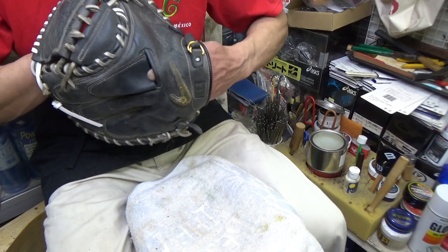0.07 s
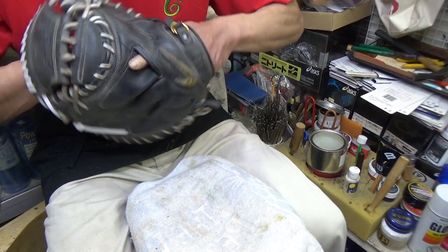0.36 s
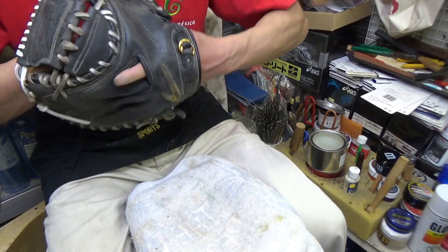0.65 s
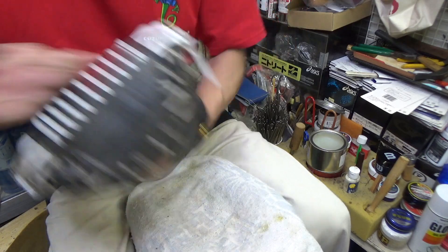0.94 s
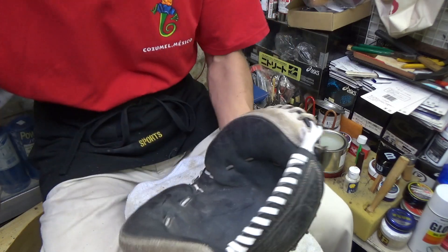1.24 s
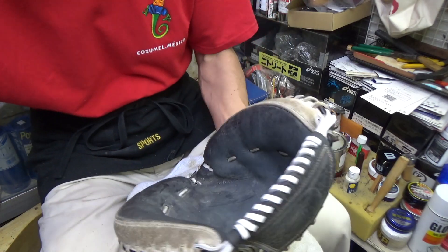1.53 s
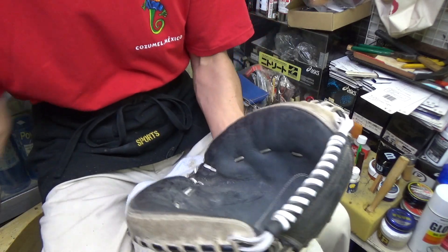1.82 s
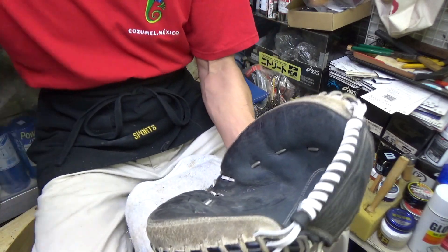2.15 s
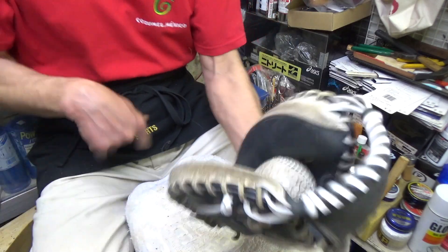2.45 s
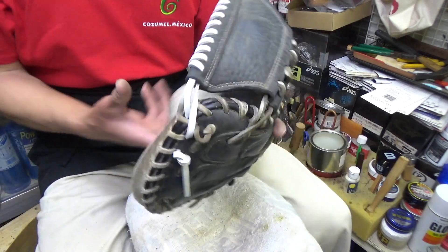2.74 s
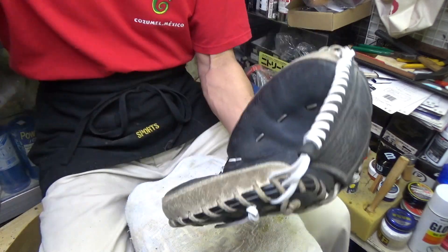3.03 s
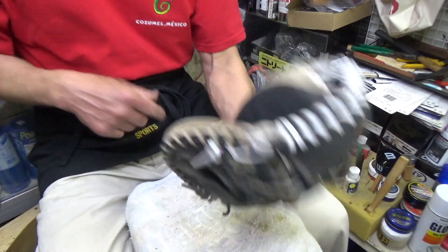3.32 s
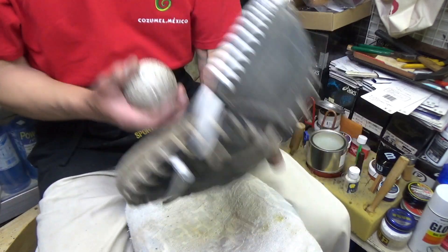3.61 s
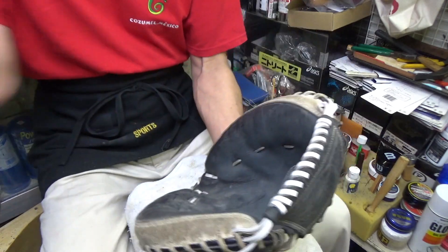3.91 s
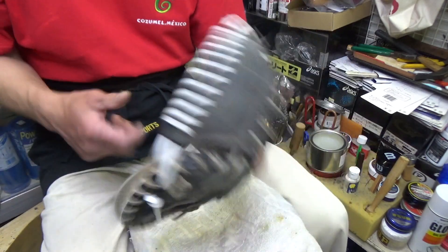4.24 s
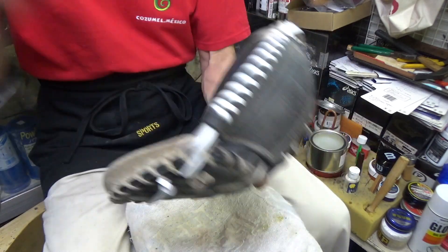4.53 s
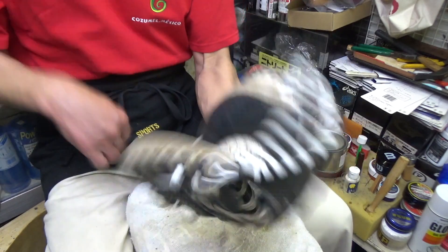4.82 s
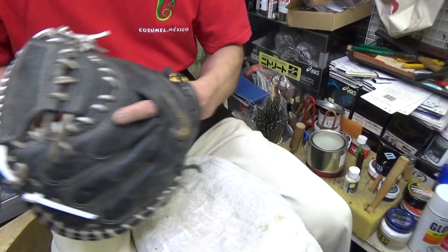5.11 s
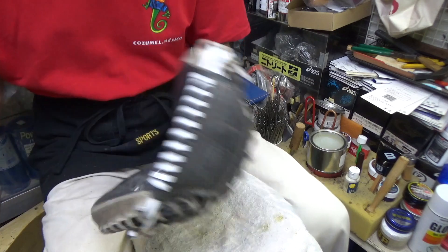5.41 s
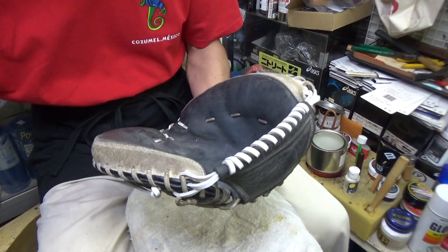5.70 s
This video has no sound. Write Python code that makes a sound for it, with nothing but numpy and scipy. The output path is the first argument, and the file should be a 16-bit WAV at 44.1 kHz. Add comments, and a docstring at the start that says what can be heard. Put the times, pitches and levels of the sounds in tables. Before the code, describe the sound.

A leather catcher's mitt is turned in the hands with soft rubbing and a dull knock, then squeezed so the hide creaks and the laces tick. A hand slaps the pocket four times at an even pace, each a loud, sharp crack with a hollow thump and brief room ring. More knocks and creaks follow. It is heard close, just left of centre, in a small workshop with faint ventilation and hum.

```python
"""Four slaps into the pocket of a leather catcher's mitt, just left of centre in a small workshop.
Palm and fingers crack on the pocket, trapped air colours each blow, and mitt and room ring.
Around the slaps the mitt is turned and flexed: the hide slides, creaks and knocks, the laces tick
and squeak. Ventilation and mains hum lie underneath. Each slap overloads the limiter behind the
camera's stereo microphones, so the room's answer comes up almost as loud as the crack."""
import sys
import numpy as np
from scipy import signal
from scipy.fft import rfft, irfft, next_fast_len
from scipy.io import wavfile
from scipy.ndimage import uniform_filter1d, minimum_filter1d, map_coordinates

SR = 44100
rng = np.random.default_rng(int(sys.argv[2]) if len(sys.argv) > 2 else 0)


def pcm_store(signal):
    """Save signal as 16-bit PCM."""
    levels = np.round(np.clip(np.atleast_2d(signal), -1, 1) * 32767)
    wavfile.write(sys.argv[1], SR, levels.astype(np.int16).T)


N = 262791
TIME = np.arange(N) / SR
AGE = np.arange(SR // 2) / SR  # seconds since a contact

# the mitt bumps against hand and knee: start_s, level_db, body_hz, rim_db, t60_s
BUMPS = [(.005, -32.5, 311, 2, 0.068), (.094, -39, 380, 13.5, 0.012), (.169, -32.5, 325, -9, 0.057),
         (0.3466, -9.5, 261, 5, 0.026), (0.509, -27, 318, 5, 0.032), (2.653, -23.5, 236, -6, 0.024),
         (2.821, -32.5, 235, -3, 0.035), (5.14, -25.5, 283, -2, 0.08), (5.153, -19.5, 282, -3, 0.037),
         (5.539, -12.5, 191, -5, 0.11), (5.546, -14, 104.5, -26, 0.13), (5.906, -21, 236, -15, 0.14),
         (5.929, -21.5, 253, 1.5, 0.12)]
# spectrum of a lace click: frequency_hz, level_db
TICK_SPECTRUM = [(100, -5), (600, -3.5), (1500, 2), (2800, 0.5), (4500, 2.5), (6500, 3), (8500, 6),
                 (12000, -1.5), (16000, -14)]
# spectrum of skin or cloth sliding: frequency_hz, level_db
SLIDE_SPECTRUM = [(88, -48), (150, -15), (341, -2.5), (730, -11), (998, -4), (1310, -12), (1450, -9.5),
                  (2400, -14), (3920, -15), (5050, -17), (8900, -13), (12400, -19), (16000, -30)]
# stereo width at the microphones: frequency_hz, side_db
STEREO_WIDTH = [(60, -19), (250, -17.5), (1000, -21), (4000, -25), (8000, -33), (14000, -43)]


def amp(db):
    """Decibels to gain."""
    return 10 ** (np.asarray(db) / 20)


def unit(x):
    """Scale to rms 1."""
    return x / np.sqrt(np.mean(x ** 2) + 1e-20)


def unit_energy(x):
    """Scale each channel to energy 1."""
    return x / np.linalg.norm(x, axis=-1, keepdims=True)


def along(points, hz):
    """Read (frequency_hz, value) points on a log axis."""
    frequencies, values = np.transpose(points)
    return np.interp(np.log(hz + 1), np.log(frequencies + 1), values)


def wobble(rate):
    """A smooth random curve with rate knots a second."""
    return map_coordinates(rng.standard_normal(int(N * rate / SR) + 4), [TIME * rate])


def coloured(x, gain_db):
    """Minimum-phase filter whose gain in dB is a function of frequency."""
    n = x.shape[-1]
    size = 2 * next_fast_len(n // 2 + 4096)
    gain = np.maximum(amp(gain_db(np.fft.rfftfreq(size, 1 / SR))), 1e-6)
    cepstrum = irfft(np.log(gain))
    cepstrum[1:size // 2] *= 2
    cepstrum[size // 2 + 1:] = 0
    return irfft(rfft(x, size) * np.exp(rfft(cepstrum)))[..., :n]


def shaped(x, spectrum):
    """Filter x by a spectrum of (frequency_hz, level_db) points."""
    return coloured(x, lambda hz: along(spectrum, hz))


def noise(spectrum, shape=N):
    """Noise of rms 1 with the given spectrum."""
    return unit(shaped(rng.standard_normal(shape), spectrum))


def resonance(hz, centre_hz, width=0.1):
    """Bell-shaped curve of height 1."""
    return 1 / (1 + ((hz - centre_hz) / (width * centre_hz)) ** 2)


def fade(t60, age=AGE):
    """Exponential decay, 60 dB down after t60 seconds."""
    return np.exp(-np.log(1000) * age / t60)


def mode(hz, t60):
    """One damped vibration."""
    return np.sin(2 * np.pi * hz * AGE) * fade(t60)


def burst(t60):
    """Dying noise of energy 1."""
    return unit_energy(rng.standard_normal(len(AGE)) * fade(t60))


def contact(t60, scatter):
    """A sharp impulse followed by a brief scatter of smaller ones."""
    force = scatter * burst(t60)
    force[0] += 1
    return unit_energy(force)


def add(track, start_s, sound):
    """Mix a sound into the track."""
    start = max(round(start_s * SR), 0)
    part = track[..., start:start + sound.shape[-1]]
    part += sound[..., :part.shape[-1]]


def room_tail(build_s=0.0011, late_db=-27, late_t60=0.56):
    """A fresh diffuse echo of the workshop, with a faint longer ring."""
    # reverberation time of the room: frequency_hz, t60_s
    room_decay = [(100, 0.34), (400, 0.2), (1500, 0.19), (5000, 0.22), (14000, 0.19)]
    hz, t, bands = signal.stft(rng.standard_normal(len(AGE)), SR, nperseg=256)
    decay = fade(along(room_decay, hz)[:, None], t) + amp(late_db) * fade(late_t60, t)
    tail = signal.istft(bands * decay, SR, nperseg=256)[1][:len(AGE)]
    return unit_energy(tail * (1 - np.exp(-(AGE / build_s) ** 2)))


def in_room(x, wet_db):
    """The direct sound plus the room's answer."""
    return x + amp(wet_db) * signal.fftconvolve(x, room_tail())[:len(x)]


def room_tone(air_db=-51):
    """Steady ventilation noise and a slightly unsteady mains hum."""
    # spectrum of the ventilation: frequency_hz, level_db
    air_spectrum = [(15, -58), (25, -9), (114, -5.5), (170, -7), (242, -0.5), (317, -11), (354, -1),
                    (394, -23.5), (476, -18), (531, -10), (1160, -12), (1400, -16.5), (1520, -20.5),
                    (5000, -27), (16000, -32.5)]
    # partials of the mains hum: pitch_hz, level_db
    partials = [(118.4, -61), (360.7, -62), (479.1, -68.5), (1157, -64.5), (2218, -75.5)]
    mid, side = noise(air_spectrum, (2, N))
    side = amp(-1.5) * shaped(side, STEREO_WIDTH)
    hum = sum(amp(db) * np.sqrt(2) * np.sin(2 * np.pi * hz * TIME + 0.5 * wobble(7.2))
              for hz, db in partials)
    return amp(air_db + 0.14 * wobble(4.66)) * np.array([mid + side, mid - side]) + hum


def slips(per_s, spread_db, smear_s=0.00091):
    """Stick-slip: random tiny impulses of unequal size, each tearing a few fibres after it."""
    chance, size = rng.random(N), rng.standard_normal(N)
    energy = (chance < per_s / SR) * amp(spread_db * np.minimum(size, 2)) ** 2
    energy = signal.lfilter([1], [1, -np.exp(-1 / (smear_s * SR))], energy)
    return unit(np.sqrt(energy) * rng.standard_normal(N))


def sliding(speed_power=1.06, scuff_db=-21.5, scuff_s=0.0081):
    """Strength of the hiss: strokes speed up and slow down, bumps scuff, the hand rustles throughout."""
    # skin and cloth stroke the leather: start_s, length_s, level_db
    strokes = [(0.079, 0.04, -36.5), (0.147, 0.16, -40.5), (0.378, 0.049, -43.5), (0.495, .06, -41.5),
               (0.544, .29, -34), (0.779, 0.07, -34.5), (0.848, 0.096, -43), (3.434, 0.066, -44.5),
               (3.61, 0.053, -49.5), (4.235, 0.086, -49.5), (4.408, .04, -41.5), (5.03, 0.066, -48.5),
               (5.149, 0.073, -52)]
    # the hand moves inside the mitt: time_s, level_db
    hand_rustle = [(0, -48.5), (1.0, -55.5), (1.35, -47), (2.1, -51), (2.7, -49.5), (3.1, -56),
                   (4.5, -57.5), (5.3, -59), (5.96, -48)]
    rubs = []
    for start_s, length_s, db in strokes:
        speed = np.abs(np.sin(np.pi * np.clip((TIME - start_s) / length_s, 0, 1)))
        rubs.append(amp(db) * speed ** speed_power)
    scuffs = [amp(db + scuff_db) * np.exp(-((TIME - s) / scuff_s) ** 2) for s, db, *_ in BUMPS]
    rustle = amp(np.interp(TIME, *np.transpose(hand_rustle)))
    return np.linalg.norm(rubs + scuffs + [rustle], axis=0)


def squeezing(grip_s=0.013, tighten_db_per_s=83, ease_s=0.011, settle_db=-15.5, settle_s=0.074):
    """Strength of the creak: each squeeze grips, tightens, eases and lets the hide settle."""
    # the hand squeezes the mitt: start_s, tighten_s, tightest_db
    squeezes = [(1.202, 0.08, -25), (1.322, 0.039, -32), (1.716, 0.024, -26.5), (1.745, 0.035, -19),
                (1.793, 0.061, -14), (1.93, 0.018, -27), (2.168, 0.021, -41.5), (5.533, 0.03, -30.5),
                (5.588, 0.065, -24), (5.696, 0.01, -33.5), (5.727, 0.022, -29.5), (5.925, .032, -27.5)]
    power = np.zeros(N)
    for start_s, tighten_s, db in squeezes:
        grip = np.clip((TIME - start_s) / grip_s, 0, 1)
        to_go = np.clip(start_s + tighten_s - TIME, 0, tighten_s)
        since = np.maximum(TIME - start_s - tighten_s, 0)
        release = np.maximum(np.exp(-since / ease_s), amp(settle_db) * np.exp(-since / settle_s))
        power += (amp(db - tighten_db_per_s * to_go) * grip * release) ** 2
    return np.sqrt(power)


def leather(creak_db=-1, brighten=0.56, uneven_db=1.86, crackle_db=-14):
    """Sliding gives a fine hiss; flexing gives coarser slips and lace clicks."""
    fine = slips(per_s=6000, spread_db=3, smear_s=0.001)
    coarse = slips(per_s=2200, spread_db=4, smear_s=0.0006) + 0.45 * rng.standard_normal(N)
    slide = unit(shaped(fine, SLIDE_SPECTRUM))
    # spectrum of the creaking hide: frequency_hz, level_db
    creak_spectrum = [(59, -30), (100, -16), (197, -4), (271, -6.5), (634, -10.5), (836, -5.5),
                      (1480, -9.5), (2470, -4), (2930, -9), (4200, -4.5), (6700, -4.5), (7940, -3),
                      (13500, -7.5), (16000, -13)]
    creak = unit(shaped(coarse, creak_spectrum))
    dull = signal.sosfilt(signal.butter(1, 1400, fs=SR, output="sos"), creak)
    squeeze = squeezing() * amp(uneven_db * wobble(70))
    tightness = np.maximum(squeeze, amp(-40)) / amp(-15)
    creak += dull * (tightness ** -brighten - 1)  # the harder the squeeze, the brighter
    creak += amp(crackle_db) * unit(shaped(slips(per_s=45, spread_db=1), TICK_SPECTRUM))
    return in_room(sliding() * slide + amp(creak_db) * squeeze * creak, wet_db=-10.5)


def squeaks():
    """A lace slipping in its hole sings briefly in a narrow, rough band."""
    # slipping laces: centre_s, level_db, pitch_hz, half_length_s
    lace_slips = [(1.12, -49, 1430, 0.15), (1.16, -51, 3220, 0.18), (2.072, -34, 810, 0.013),
                  (2.702, -39.5, 1320, 0.033), (3.658, -41.5, 2920, 0.0036)]
    out = np.zeros(N)
    for centre_s, db, hz, half_length_s in lace_slips:
        band = signal.butter(2, [0.83 * hz, 1.19 * hz], "band", fs=SR, output="sos")
        rub = unit(signal.sosfilt(band, rng.standard_normal(N)))
        out += amp(db) * rub * np.exp(-((TIME - centre_s) / half_length_s) ** 2)
    return out


def knocks():
    """Bumps ring the padded body and the stiff rim; low ones set in more slowly."""
    out = np.zeros(N)
    for start_s, db, body_hz, rim_db, t60 in BUMPS:
        body = mode(body_hz, t60) - 0.4 * mode(1.36 * body_hz, t60)
        body += 0.24 * mode(1.89 * body_hz, 1.13 * t60)
        rim = mode(980, 0.012) - mode(530, 0.014) - 0.25 * mode(1900, 0.008)
        onset = 1 - np.exp(-AGE * body_hz / 0.2)
        add(out, start_s, in_room(amp(db) * (body + amp(rim_db) * rim) * onset, wet_db=-9.5))
    return out


def ticks(snap_db=4, rustle_db=-4, echo_db=-11):
    """Laces flick the leather: a dry snap, a brief rustle of the hide, a short ring of the stiff web."""
    # lace ticks and leather snaps: start_s, level_db, web_db
    flicks = [(0.102, -19, -24.5), (0.5107, -28, -28.5), (1.124, -23.5, -44), (1.1839, -30, -35.5),
              (1.2854, -8, -50), (1.4046, -18, -35), (1.4564, -18, -41), (1.5331, -12.5, -59),
              (1.607, -4.5, -36), (1.6286, -4.5, -40), (1.6595, -8, -30.5), (1.92, 1, -45),
              (1.968, -12, -51), (1.9987, -12, -52), (2.0687, -10.5, -37), (2.413, -14.5, -38),
              (2.6866, 1, -21), (3.4867, 1.5, -17.5), (3.612, -15, -35.5), (4.3616, -5.5, -21),
              (5.595, -8, -36), (5.6965, -12, -39), (5.7247, -13, -32), (5.7472, -5, -26.5),
              (5.791, -9.5, -42), (5.8294, -14, -38), (5.899, -13, -36)]
    out = np.zeros(N)
    for start_s, db, web_db in flicks:
        force = contact(t60=0.008, scatter=0.8) + amp(echo_db) * room_tail()
        add(force, 0.001, amp(rustle_db) * burst(t60=0.027))
        snap = amp(db + snap_db) * unit_energy(shaped(force, TICK_SPECTRUM))
        web = amp(web_db) * (mode(764, 0.027) - 0.87 * mode(1310, 0.019))
        add(out, start_s + 0.0008, snap + web)
    return out


def slaps(crack_db=24, thump_db=-2, puff_db=-13, ring_db=-14, echo_db=19, swish_db=-46):
    """Air is squeezed out, palm and fingers crack on the pocket, then mitt and room ring."""
    # blows, with the resonances of the cupped palm and the finger gap:
    # start_s, level_db, tilt_db_per_octave, puff_s, finger_delay_s, palm_hz, palm_db, gap_hz, gap_db
    blows = [(2.4378, -3, -1, 0.014, 0.0038, 667, 10, 1000, 7),
             (3.2579, -1, -0.57, 0.016, 0.0028, 500, 9.5, 966, 9.5),
             (4.0564, 0, -1, 0.012, .0018, 1080, 5.5, 1720, 8.5),
             (4.8433, 1, -1, 0.013, 0.0014, 393, 2, 1370, 8.5)]
    # modes of the mitt and the workshop: pitch_hz, level_db, t60_s
    ring_modes = [(65.6, -12, 0.36), (126, 1, 0.25), (182, -15, 0.13), (231.5, -7, 0.27), (268.8, 5.5, 0.2),
                  (333, 3.5, 0.24), (405.8, 0, 0.19), (479.6, -6, 0.16), (608, -4.5, 0.18),
                  (739.5, -1.5, 0.17), (1002, -10, 0.25)]
    # spectra of the crack, the room's answer and the escaping air: frequency_hz, level_db
    crack_spectrum = [(40, -26), (110, -1.5), (300, 11), (550, 1), (1000, 0), (1800, -4.5), (3000, -8),
                      (7500, -9.5), (12000, -10), (16000, -31)]
    echo_spectrum = [(24, -29), (40, -34), (91, -16.5), (124, -9.5), (237, -5), (297, -6.5), (329, -4),
                     (491, -12), (918, -11.5), (2770, -16), (3060, -17.5), (3470, -18.5), (6820, -18.5),
                     (12800, -24.5), (16000, -33)]
    puff_spectrum = [(60, -29), (300, 11), (1000, -8), (2000, -13.5), (5000, -28), (16000, -54)]
    out = np.zeros(N)
    for start_s, db, tilt, puff_s, finger_delay_s, palm_hz, palm_db, gap_hz, gap_db in blows:
        def cupped_hand(hz):
            """Gain in dB: air trapped under the hand lends each blow its own resonances."""
            slope = tilt * np.log2((hz + 100) / 1000)
            return slope + palm_db * resonance(hz, palm_hz) + gap_db * resonance(hz, gap_hz)

        hit = np.zeros(N)
        force = contact(t60=0.02, scatter=5)
        add(force, finger_delay_s, contact(t60=0.028, scatter=5))
        crack = unit_energy(coloured(shaped(force, crack_spectrum), cupped_hand))
        add(hit, start_s, amp(crack_db) * crack)
        # the padding gives way a moment after the skin lands
        thump = mode(276, 0.054) + 0.5 * mode(370, 0.025) + 0.5 * mode(161, 0.038)
        add(hit, start_s + 0.0025, amp(thump_db) * thump * (1 - np.exp(-AGE / 0.003)))
        ring = np.zeros(len(AGE))
        for hz, mode_db, t60 in ring_modes:
            gain = amp(mode_db + rng.normal(0, 1.5))
            ring += gain * mode(hz * rng.normal(1, 0.004), t60) * rng.choice([-1, 1])
        add(hit, start_s, amp(ring_db) * ring * (1 - np.exp(-AGE / 0.005)))
        echo = unit_energy(coloured(shaped(room_tail(build_s=0.017), echo_spectrum), cupped_hand))
        add(hit, start_s, amp(echo_db) * echo)
        # the cushion of air escapes just before the skin lands
        puff = noise(puff_spectrum, len(AGE)) * (AGE / puff_s) * (AGE < puff_s)
        add(hit, start_s - puff_s, amp(puff_db) * puff)
        # the sleeve swishes as the arm speeds up
        swing = np.exp(-np.abs(TIME - start_s) / 0.032)
        sleeve = noise(SLIDE_SPECTRUM) + amp(13) * noise(echo_spectrum)
        out += amp(db) * (hit + amp(swish_db) * swing * sleeve)
    return out


def scene():
    """The mitt sits just left of centre; nearby clutter reflects differently into the two microphones."""
    # balance between the microphones: frequency_hz, left_over_right_db
    balance = [(60, 1.5), (250, 2.1), (1000, 0.7), (3000, 1.5), (8000, 0.1), (14000, -0.45)]
    mitt = slaps() + ticks() + knocks() + squeaks() + leather()
    clutter = burst(t60=0.08)
    side = shaped(signal.fftconvolve(mitt, clutter)[:N], STEREO_WIDTH)
    left = coloured(mitt + side, lambda hz: along(balance, hz) / 2)
    right = coloured(mitt - side, lambda hz: -along(balance, hz) / 2)
    return np.array([left, right]) + room_tone()


def record(dry, low_cut_hz=45, top_hz=16100, release_db_per_s=800):
    """The camera cuts rumble, ducks each crack with a fast look-ahead limiter and cuts the top steeply."""
    dry = signal.sosfilt(signal.butter(2, low_cut_hz, "high", fs=SR, output="sos"), dry)
    ahead = SR // 600
    over_db = np.maximum(20 * np.log10(np.abs(dry).max(axis=0) + 1e-9), 0)  # above full scale
    held_db = -minimum_filter1d(-over_db, 2 * ahead)
    recovery_db = release_db_per_s * TIME
    duck_db = np.maximum.accumulate(held_db + recovery_db) - recovery_db
    limited = dry * amp(-uniform_filter1d(duck_db, ahead))
    size = next_fast_len(N + SR // 2)
    high_cut = 1 / (1 + (np.fft.rfftfreq(size, 1 / SR) / top_hz) ** 200)
    return irfft(rfft(limited, size) * high_cut, size)[:, :N]


dry = scene()
out = record(dry)
pcm_store(out)
```